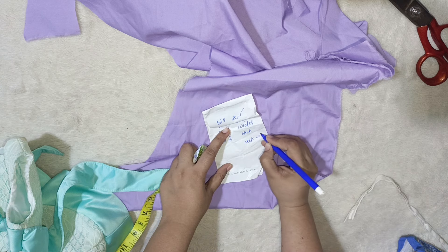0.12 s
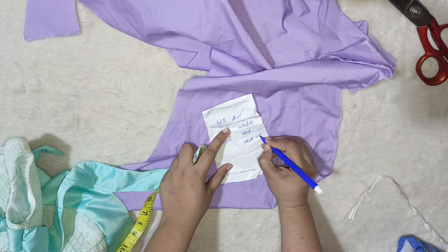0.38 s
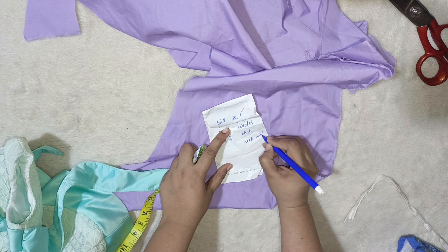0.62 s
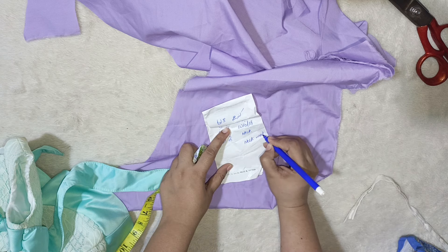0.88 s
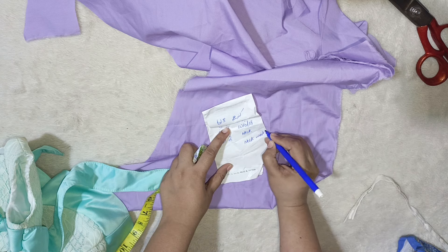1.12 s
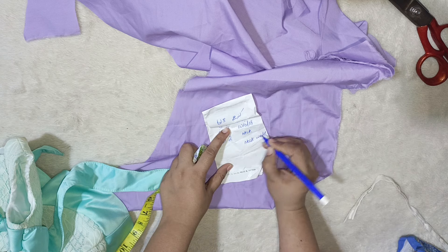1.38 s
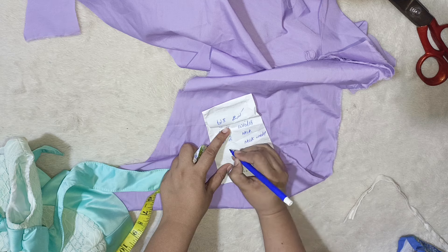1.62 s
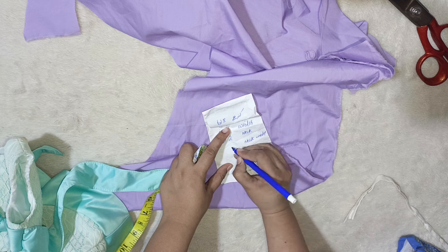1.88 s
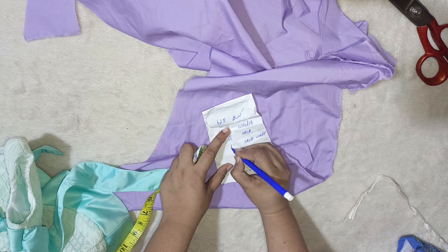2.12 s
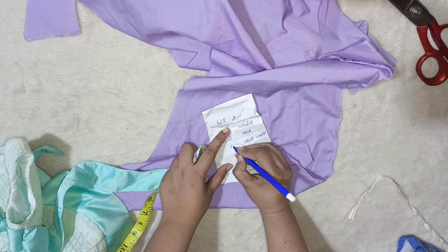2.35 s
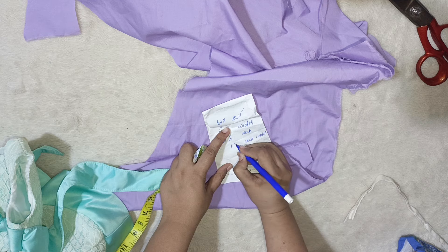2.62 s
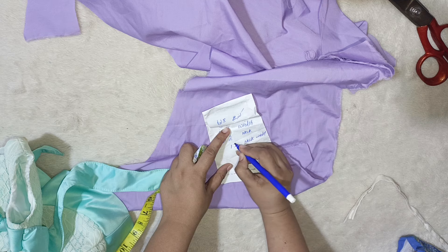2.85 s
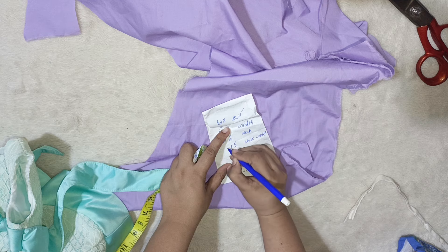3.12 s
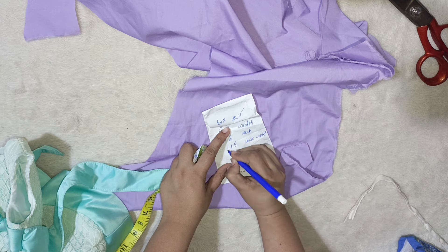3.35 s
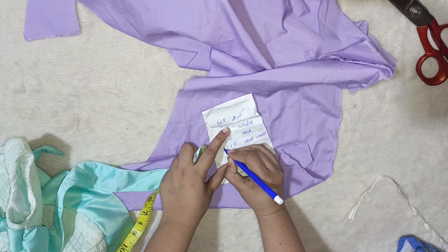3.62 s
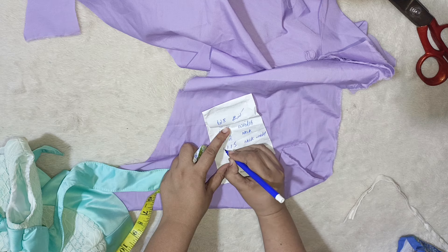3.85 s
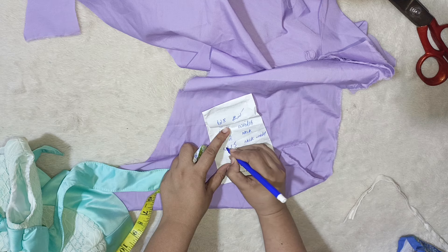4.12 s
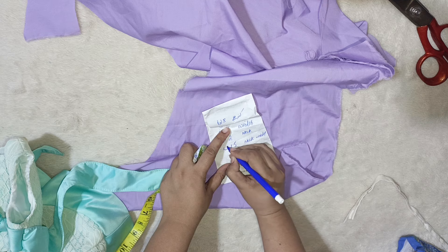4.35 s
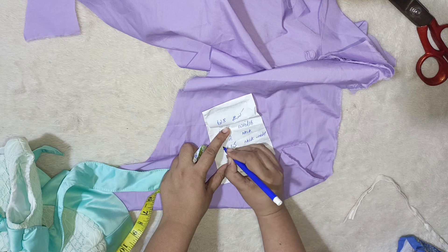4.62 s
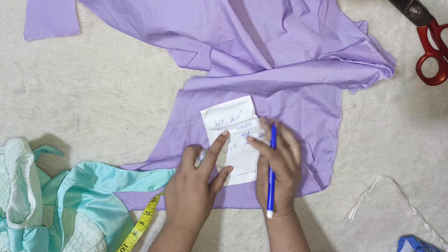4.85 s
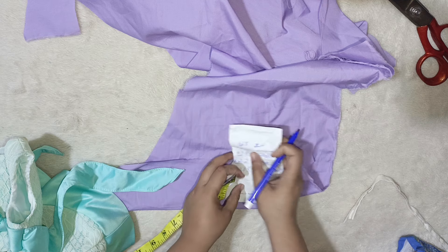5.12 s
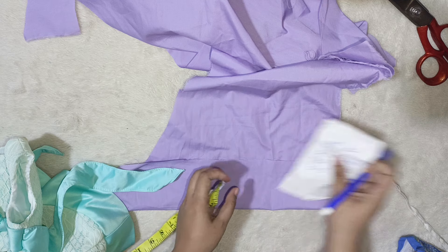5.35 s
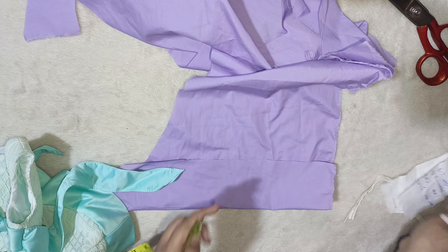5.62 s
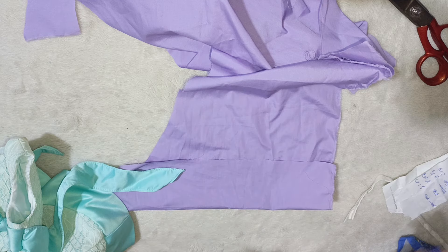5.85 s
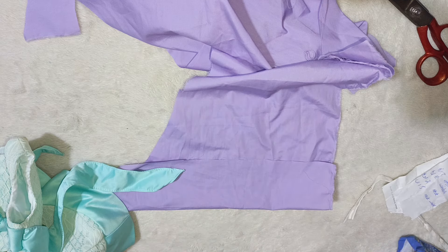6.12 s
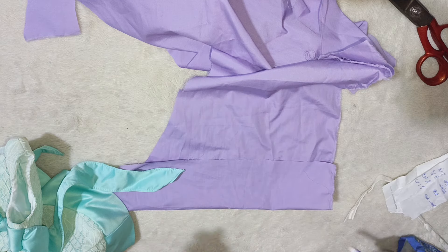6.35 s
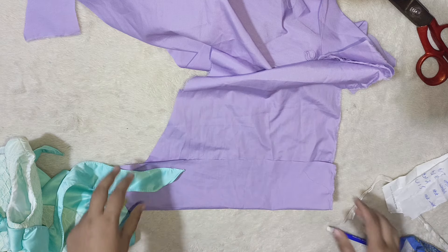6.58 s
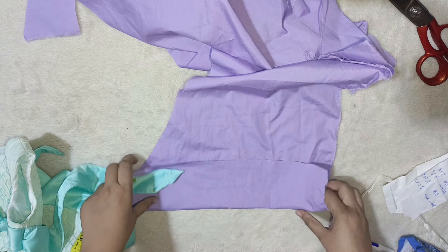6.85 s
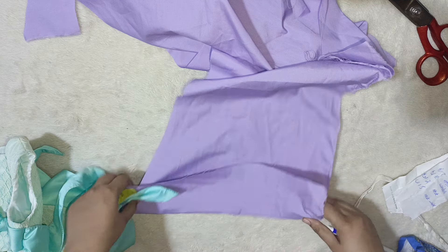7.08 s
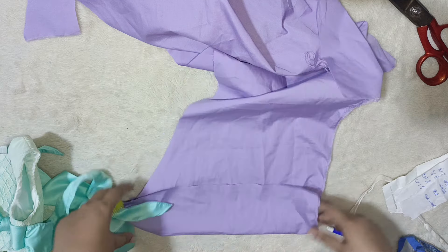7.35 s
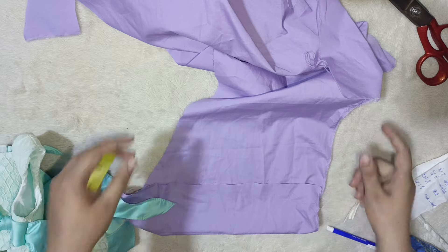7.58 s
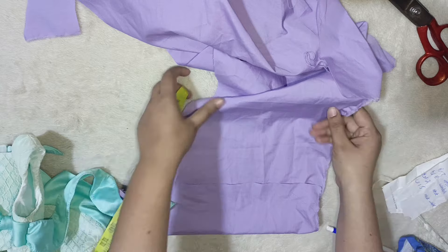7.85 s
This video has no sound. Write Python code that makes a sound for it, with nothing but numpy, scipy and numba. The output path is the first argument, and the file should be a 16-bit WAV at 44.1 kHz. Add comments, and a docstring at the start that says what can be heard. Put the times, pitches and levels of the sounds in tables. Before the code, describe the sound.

Close microphone in a quiet room with soft hiss and faint hum. Nearly silent at first, with tiny pen strokes and ticks on paper; light crackles gather around the middle. Then the slip is snatched up with a loud, bright, snapping crumple and a cupped, hollow rustle, fading as it slides away over cloth. A faint tap follows, then a pen lands with a dull double thump on a padded floor.

```python
"""Paper slip and dropped pen

A hand writes on a paper slip lying on cloth, lifts and crumples the slip, then drops a pen on a padded floor.
The sheet rustles as clicks and hiss through its resonances and snaps as ringing spikes of noise.
Hollow booms and lingering bands are resonant or narrow noise; soft thumps are short smooth swings.
Rumble in the lowest octaves, a quiet room hiss and a faint hum lie below."""
import sys
import numpy as np
from scipy import signal
from scipy.fft import rfft, irfft
from scipy.io import wavfile
from scipy.ndimage import uniform_filter1d
from numba import njit

SR = 44100
rng = np.random.default_rng(int(sys.argv[2]) if len(sys.argv) > 2 else 0)


def inscribe(sig):
    """Save sig as 16-bit PCM at rate SR to the path in sys.argv[1].

    A 1-D sig is mono; a 2-D sig holds one channel per row.
    Samples are clipped to [-1, 1] before scaling.
    """
    pcm = np.round(np.clip(np.atleast_2d(sig).T, -1, 1) * 32767)
    wavfile.write(sys.argv[1], SR, pcm.astype(np.int16))


def how_loud(loudness_db):
    """Turn decibels into a plain amplitude multiplier (0 dB gives 1, 20 dB gives 10)."""
    steps = np.asarray(loudness_db, float) / 20
    return 10 ** steps


N = 351477

# Resonances of the sheet, before rustle and snaps scale them.
# Each row: centre in hertz, width in hertz, relative level in dB.
SHEET_MODES = [(1450, 120, 1), (2070, 58, -4), (2740, 320, -3.5), (3630, 260, -4), (4500, 100, -8.5),
               (5707, 190, 1.5)]


def rms_one(x):
    """Normalisation: scale to unit rms."""
    return x / np.sqrt(np.mean(x ** 2) + 1e-20)


def even_level(x, samples):
    """Envelope division: hold the short-term rms over a sliding window near one."""
    return x / np.sqrt(uniform_filter1d(x ** 2, size=samples) + 1e-12)


def band(x, low_hz, high_hz):
    """Butterworth band-pass: flat within the band, smooth slopes outside."""
    return signal.sosfilt(signal.butter(2, [low_hz, high_hz], "band", fs=SR, output="sos"), x)


def cut(x, hz, kind):
    """Fourth-order Butterworth high- or low-pass: a steep slope beyond the corner."""
    return signal.sosfilt(signal.butter(4, hz, kind, fs=SR, output="sos"), x)


def drift(corner_hz):
    """Low-passed noise: slow random motion of unit rms, from two equal poles at corner_hz."""
    r = np.exp(-40 * np.pi * corner_hz / SR)  # computed at every 20th sample
    slow = signal.lfilter([1], [1, -2 * r, r * r], rng.standard_normal(N // 20 + 2002))[2000:]
    return np.interp(np.arange(N) / 20, np.arange(len(slow)), rms_one(slow))


def coloured(x, spectrum):
    """Spectral shaping: weight noise by a curve in dB over log frequency."""
    hz, db = np.transpose(spectrum)
    log_hz = np.log(np.maximum(np.fft.rfftfreq(N, 1 / SR), 1))
    return irfft(rfft(x) * how_loud(np.interp(log_hz, np.log(hz), db)), N)


def resonance(x, hz, width_hz):
    """Damped oscillator: a two-pole resonance with gain 1 on top."""
    r = np.exp(-np.pi * width_hz / SR)
    poles = [1, -2 * r * np.cos(2 * np.pi * hz / SR), r * r]
    return signal.lfilter(np.array([1, 0, -1]) * (1 - r * r) / 2, poles, x)


@njit
def moving_resonance(x, r, w):
    """Time-varying oscillator: centre and width move; white noise keeps its power."""
    y = np.zeros(len(x))
    for i in range(2, len(x)):
        drive = np.sqrt((1 - r[i] ** 2) / 2) * (x[i] - x[i - 2])
        y[i] = drive + 2 * r[i] * np.cos(w[i]) * y[i - 1] - r[i] ** 2 * y[i - 2]
    return y


def sliding(x, hz, width_hz):
    """Stiffness modulation: a resonance of top gain 1 whose centre slides with the bend of the sheet."""
    bend_share, bend_hz = 0.076, 1.7  # rms share of the pitch, corner of the motion
    r = np.exp(-np.pi * width_hz / SR)
    w = 2 * np.pi * hz / SR * np.exp(bend_share * drift(bend_hz))
    return np.sqrt((1 - r * r) / 2) * moving_resonance(x, np.full(N, r), w)


def place(out, s, sound):
    """Superposition: add a sound at time s in seconds."""
    i = round(s * SR)
    return out + np.pad(sound, (i, N))[:N]


def swells(rows):
    """Exponential growth and decay: straight lines in dB, 20 dB down at the end of the rise and fall times."""
    out = np.zeros(N)
    for peak, rise_ms, fall_ms, db in rows:
        rise, fall = rise_ms / 1000, fall_ms / 1000
        # each side runs on for twice its time
        i = np.arange(max(round((peak - 2 * rise) * SR), 0), min(round((peak + 2 * fall) * SR), N))
        t = i / SR - peak
        out[i] += how_loud(db - 20 * np.maximum(-t / rise, t / fall))
    return out


def curve_gain(s, db):
    """Logarithmic interpolation: gain along a curve in dB, silent outside it."""
    return how_loud(np.interp(np.arange(N) / SR, s, db, left=-200, right=-200))


def strokes():
    """Friction envelopes: levels of the rustle, its upper part and its top end, strokes over a steady slide."""
    # Separate strokes of pen, hand and fingers on sheet and cloth. Each row: peak time in seconds,
    # rise in ms, fall in ms, rustle level in dB, top end in dB over the rustle.
    stroke_rows = [(.178, 24, 31, -80.5, 9.5), (0.345, 16, 17, -73.5, 9), (0.434, 68, 45, -74, -1),
                   (.5, 16, 51, -71.5, -4), (.687, 44, 44, -73, 5), (0.816, 43, 48, -72.5, 2),
                   (0.913, 27, 31, -69.5, -12), (1.136, 27, 44, -70.5, -30), (1.195, 45, 38, -68.5, -4),
                   (1.329, 58, 54, -72, 4), (1.691, 32, 33, -61, -7), (2.205, 23, 53, -42, -15),
                   (2.429, 500, 330, -73.5, -44), (2.604, 6.5, 20, -63, -7), (2.698, 67, 65, -60, -56),
                   (2.824, 55, 50, -69, -29), (3.007, 47, 50, -60, -49), (3.056, 2.9, 290, -51.5, -2.5),
                   (3.087, 20, 33, -45, -4), (3.137, 170, 85, -67, -6), (3.186, 44, 62, -50, -16),
                   (3.303, 11.5, 9.6, -47, -12), (3.321, 1.86, 20, -56, -22), (3.388, 38, 79, -56, -28),
                   (3.421, 29, 13, -49, -22), (3.622, 52, 46, -67, -19), (3.699, 37, 44, -62, -43),
                   (4.003, 40, 39, -50, -51), (4.425, 25, 28, -67, -34), (4.712, 30, 35, -66, -29),
                   (4.779, 3.5, 11.6, -53.5, -4.5), (4.994, 39, 110, -46.5, 3), (5.06, 31, 23, -35, -4),
                   (5.096, 15, 35, -39.5, -16), (5.168, 78, 42, -31.5, -3), (5.194, 110, 25, -27.5, -9),
                   (5.266, 7, 68, -38, -20), (5.291, 32, 27, -32.5, -9), (5.413, 57, 20, -47, -9.5),
                   (5.451, 16, 53.6, -37, -8), (5.482, 32, 19, -43.5, -12), (5.611, 19, 47, -45.5, -13),
                   (5.652, 21, 41, -59.5, -10), (6.131, 11, 157, -62, -6), (6.511, 7.2, 200, -61.5, -9),
                   (6.668, 230, 35, -69.5, -8), (6.56, 90, 83, -53.5, -14.5), (6.968, 59, 74, -69.5, -1),
                   (7.58, 55, 55, -70.5, -3.5)]
    # The slip is gathered up and drawn away over the cloth. Each row: time in seconds, rustle level in dB.
    slide_rows = [(4.79, -73.5), (4.93, -62), (5.24, -45), (5.36, -51), (5.53, -63.5), (5.691, -55),
                  (5.84, -65), (5.99, -58), (6.109, -63), (6.19, -65), (6.219, -76.5)]
    slide_top_db = -13.5  # over the rustle of the slide
    slide = curve_gain(*np.transpose(slide_rows))
    levels = []
    # the part above 3.3 kHz takes a quarter of the top end's offset, the top end all of it
    for share in (0, 0.25, 1):
        rows = [(s, rise, fall, db + share * top_db) for s, rise, fall, db, top_db in stroke_rows]
        levels.append(how_loud(share * slide_top_db) * slide + swells(rows))
    return levels


def rustle():
    """Stick-slip friction: fibres slip as clumped clicks over a hiss, grainier when loud, and excite the sheet."""
    # Colour of the sheet at the microphone. Each row: frequency in hertz, density in dB per hertz.
    sheet_colour = [(600, -24), (850, -4), (1300, -1), (2100, 0), (3100, -6), (4800, -3.5), (6600, -7),
                    (8300, -20), (11500, -17), (13500, -19), (14700, -11), (16300, -13), (17000, -45)]
    # Span in which the sheet, pressed flat, lacks its part below 1.6 kHz: start and end in seconds.
    taut_span = (3.145, 3.285)
    held_until_s, flat_song_share = 5.53, .3  # once let go and dragged flat, the sheet hardly sings
    clicks_per_s, clump_db, spread_db = 1300, 5.5, 5  # rate before clumping
    modes_db, sing_db, flutter_db = 1.5, 6, 3
    low_level, upper_level, top_level = strokes()
    t = np.arange(N) / SR

    force = np.clip((20 * np.log10(low_level + 1e-9) + 66) / 20, .25, 1)
    born = rng.random(N) < clicks_per_s * how_loud(clump_db * drift(80)) / SR
    size = how_loud(spread_db * np.minimum(rng.exponential(1, N), 4))
    grains = born * size * rng.choice([-1, 1], N)
    slips = force * rms_one(grains) + np.sqrt(1.6 - force ** 2) * rng.standard_normal(N)

    # every resonance sings up and down in level while its centre slides
    song = sum(how_loud(db + sing_db * drift(14)) * sliding(slips, hz, w) for hz, w, db in SHEET_MODES)
    song_share = np.where(t < held_until_s, 1, flat_song_share)
    sheet = coloured(slips + how_loud(modes_db) * song_share * song, sheet_colour)

    low = rms_one(cut(sheet, 7800, "low"))
    top = rms_one(cut(sheet, 7800, "high"))
    is_taut = (t > taut_span[0]) & (t < taut_span[1])
    low = np.where(is_taut, cut(low, 1600, "high"), low)
    lower = low_level * cut(low, 3300, "low")
    upper = how_loud(1.5) * upper_level * cut(low, 3700, "high")
    return how_loud(flutter_db * force * drift(94)) * (lower + upper + top_level * top)


def snaps():
    """Impulse response: a crease pops as a spike with brief crackle, ringing its patch and higher sheet modes."""
    # Creases that pop. Each row: time in seconds, peak below 7.8 kHz in dB, ring in hertz,
    # top-end peak in dB over that peak.
    crease_rows = [(0.335, -68.5, 2020, 25), (0.629, -51.5, 1740, -21), (0.896, -50.5, 1690, -16),
                   (1.677, -46, 1450, -1), (1.694, -40.5, 1225, -27), (2.0725, -53, 1400, -20),
                   (2.133, -49, 1490, -7), (2.138, -47.5, 1310, -22), (2.155, -54, 1850, -20),
                   (2.1767, -45, 2070, -23), (2.197, -24, 1820, -8.5), (2.246, -41, 1920, -27),
                   (2.381, -37.5, 5650, -10), (2.396, -50.5, 990, -25), (2.4377, -46, 1350, -28),
                   (2.601, -42, 2030, -19), (2.823, -47, 2980, -25), (2.842, -43.5, 1710, -20),
                   (2.9739, -38.5, 2040, -18), (3.0534, -35.5, 2200, 0), (3.069, -45, 1390, -7),
                   (3.092, -24, 2560, -8), (3.155, -27.5, 2700, -7), (3.183, -21.5, 3250, -30),
                   (3.22, -34, 2300, -23), (3.2988, -26, 3420, -54), (3.307, -26.5, 2070, -14),
                   (3.319, -53, 1530, -16), (3.366, -45, 2100, -15), (3.4043, -20.5, 2250, -13),
                   (3.4197, -39, 1570, -11), (3.6372, -46.5, 990, -8), (3.9582, -40, 2490, -38),
                   (4.415, -45, 1590, -28), (4.707, -51.5, 2210, -23), (4.7785, -35.5, 2370, -13),
                   (4.8378, -45.5, 3570, 1), (4.8682, -46, 6400, -5), (4.986, -28, 3900, -8.5),
                   (5.0474, -15, 3900, -8), (5.091, -25, 2060, -12.5), (5.1298, 3, 4116, -4.5),
                   (5.158, -19.5, 1480, -3.5), (5.171, -7.5, 6287, -18.5), (5.175, -16, 3570, -9.5),
                   (5.1868, -14, 2030, -15.5), (5.2625, -17, 4770, -11.5), (5.2892, -2, 2766, -7),
                   (5.465, -22.5, 1660, -20.5), (5.4831, -26, 1380, -8.5), (5.5564, -51, 2160, 3),
                   (5.578, -37, 4050, -5), (5.6022, -31, 2420, -19.5), (5.611, -39.5, 1500, -14),
                   (5.649, -38, 1490, -4), (5.696, -53, 3060, 11), (5.736, -30.5, 4200, -13),
                   (6.1251, -40, 1600, -4), (6.506, -38.5, 1830, -17.5), (6.538, -40, 3900, -12.5),
                   (7.74, -55.5, 2305, -24)]
    ring_db, ring_width = 15, 0.055  # ring gain for a -40 dB pop, width as a share of its pitch
    modes_db, mode_width = 3, 2.5  # mode gain, widening of the sheet's resonances
    out, t = np.zeros(N), np.arange(2000) / SR
    noise = rng.standard_normal((len(crease_rows), len(t) + len(SHEET_MODES)))
    for (s, db, hz, top_db), draw in zip(crease_rows, noise):
        crackle_s = .008 + .00012 * (db + 60)  # time to fall 60 dB: big folds crackle longer
        pop = draw[:len(t)] * how_loud(-60 * t / crackle_s) * .3
        pop[0] -= 3
        spread = 2.16 + 0.02 * (db + 47)  # big folds sound broad, small ticks keep one colour
        edges = max(hz / spread, 800), min(spread * hz, 7200)
        body = band(band(pop, *edges), *edges)
        body = body + how_loud(ring_db - .2 * (db + 40)) * resonance(pop, hz, ring_width * hz)
        for (mode_hz, width_hz, mode_db), luck in zip(SHEET_MODES, draw[len(t):]):
            if mode_hz <= hz:
                continue
            # 7.2 dB weaker per octave above the ring, with random strength
            gain = how_loud(modes_db + mode_db + 2.3 * luck - 7.2 * np.log2(mode_hz / hz))
            width = mode_width * width_hz
            body = body + gain * resonance(resonance(pop, mode_hz, width), mode_hz, 2 * width)
        body = cut(body, 7800, "low")
        top = band(pop, 8500, 16000) + 2.5 * resonance(pop, 14800, 900)
        sound = body / np.abs(body).max() + how_loud(top_db) * top / np.abs(top).max()
        out = place(out, s, how_loud(db) * sound)
    return out


def hollow():
    """Cavity resonance: noise passes three times through one moving resonance, for cupped sheet and floor."""
    # The sheet cupped in the hand booms along with its rustle. Each row: time in seconds,
    # centre in hertz, boom in dB over the rustle before the common gain below.
    cup_rows = [(4.94, 563, -6), (4.99, 709, -2.5), (5.1, 460, -5), (5.19, 540, -0.7), (5.25, 512, 1.5),
                (5.289, 615, -3), (5.36, 527, 0.5), (5.41, 724, 6), (5.46, 650, -2), (5.52, 610, 9),
                (5.581, 625, -3)]
    # Booms of the padded floor. Each row: peak time in seconds, rise in ms, fall in ms,
    # level in dB before the common gain and the padding's low-pass, centre in hertz.
    boom_rows = [(3.099, 45, 29, -54.5, 214), (6.133, 7.6, 70, -40.5, 235.5), (6.19, 45, 54, -59.5, 169.9),
                 (6.532, 19, 58, -25, 324), (6.576, 52, 48, -32, 289)]
    stage_width, padding_cut_hz = 0.936, 396  # width of one pass as a share of its centre
    gain_db, flutter_db = 2, 1
    s, _, over_db = np.transpose(cup_rows)
    cupped = curve_gain(s, over_db) * strokes()[0]
    floor = swells([row[:-1] for row in boom_rows])

    centres = sorted([row[:2] for row in cup_rows] + [(row[0], row[-1]) for row in boom_rows])
    hz = np.interp(np.arange(N) / SR, *np.transpose(centres))
    r, w = np.exp(-np.pi * stage_width * hz / SR), 2 * np.pi * hz / SR
    tone = rng.standard_normal(N)
    for _ in range(3):
        tone = moving_resonance(tone, r, w)
    tone = even_level(cut(tone, 1100, "low"), 2000)
    # the padding swallows the upper part of the floor's boom
    padded = cut(tone, padding_cut_hz, "low")
    return how_loud(flutter_db * drift(40) + gain_db) * (cupped * tone + floor * padded)


def lingering(rows, width_hz, flutter_db, edge_s):
    """Heterodyning: slow complex noise shifted up to a wandering pitch makes steep bands, gated on and off."""
    wander_share = 0.012  # rms share of the pitch
    out, wander, flutter = np.zeros(N), drift(9.8), drift(78)
    edge = signal.butter(4, width_hz / 2, fs=SR, output="sos")
    for start, end, hz, first_db, last_db in rows:
        t = np.arange(round((end - start) * SR)) / SR
        real, imag = signal.sosfilt(edge, rng.standard_normal((2, 14000)))
        slow = (real + 1j * imag) / np.sqrt(uniform_filter1d(real ** 2 + imag ** 2, size=500) / 2)
        pitch = hz * np.exp(wander_share * wander[round(start * SR):][:len(t)])
        carrier = np.exp(2j * np.pi * np.cumsum(pitch) / SR)
        narrow = np.real(slow[3000:][:len(t)] * carrier)  # past the filter's onset
        gate = np.clip(np.minimum(t, t[-1] - t) / edge_s, 0, 1)
        out = place(out, start, gate * how_loud(np.linspace(first_db, last_db, len(t))) * narrow)
    return out * how_loud(flutter_db * flutter)


def tones():
    """Bandwidth sets roughness: narrow noise lingers as tones, broader noise murmurs more roughly."""
    # Narrow tones that linger. Each row: start and end in seconds, centre in hertz, first and last level in dB.
    tone_rows = [(0.424, 0.465, 1950, -70, -76), (0.491, 0.525, 2770, -73, -79),
                 (0.778, 0.88, 409, -91, -62.5), (1.115, 1.142, 2940, -68, -71),
                 (1.194, 1.242, 1964, -62, -77), (2.035, 2.162, 1585, -81, -67),
                 (3.056, 3.15, 772, -66, -63), (3.072, 3.094, 1450, -39, -45),
                 (3.088, 3.135, 1450, -53, -67), (3.15, 3.277, 2006, -55.5, -65),
                 (3.165, 3.215, 1743, -56, -63), (3.235, 3.279, 2790, -57, -74),
                 (3.308, 3.358, 778, -52.5, -69), (3.404, 3.435, 773, -54, -56),
                 (4.018, 4.155, 800, -64, -70), (4.147, 4.29, 796, -56, -69),
                 (5.102, 5.132, 1837, -30, -32), (5.128, 5.158, 2070, -37, -32),
                 (5.118, 5.21, 253, -40.5, -42), (5.493, 5.61, 622, -59, -55),
                 (5.604, 5.765, 610, -39.5, -60.5), (5.758, 5.883, 617, -47, -70.5),
                 (5.854, 5.98, 622, -48, -61), (5.935, 6.035, 408, -58, -62),
                 (5.972, 6.134, 603, -46, -58.5), (6.136, 6.219, 459, -36, -64),
                 (6.562, 6.65, 928, -55.5, -69), (6.616, 6.689, 341, -36, -57)]
    # Broader, rougher bands of murmuring noise. Each row: start and end in seconds,
    # centre in hertz, first and last level in dB.
    broad_rows = [(0.425, 0.46, 1450, -75, -73), (0.892, 0.926, 798, -56.5, -75),
                  (1.272, 1.312, 707, -68, -73), (2.18, 2.285, 721, -49, -55), (2.395, 2.45, 780, -65, -81),
                  (2.448, 2.506, 786, -63, -63), (2.665, 2.72, 1900, -66, -76),
                  (3.646, 3.72, 705, -61, -63.5), (5.355, 5.44, 2700, -49, -63),
                  (5.435, 5.5, 2610, -37, -64), (6.965, 7.0, 4500, -72, -76)]
    narrow = lingering(tone_rows, width_hz=72, flutter_db=1.8, edge_s=.008)
    broad = lingering(broad_rows, width_hz=175, flutter_db=3.5, edge_s=.015)
    return narrow + broad


def thuds():
    """Gaussian pulse: a soft thump swells and fades evenly over a few smooth swings."""
    # Soft low thumps in the crumpling sheet and, later, on the padded floor. Each row: time in seconds,
    # peak level in dB, swing in hertz, half length (fall to 1/e) in seconds.
    thump_rows = [(3.404, -30.5, 823, 0.003), (4.988, -34.5, 727, 0.0044), (5.094, -18, 386, 0.003),
                  (5.161, -19, 328, 0.0032), (5.168, -19.5, 630, 0.0014), (5.189, -18.5, 470, 0.0018),
                  (6.131, -27.5, 246, 0.0043), (6.508, -11.5, 283, 0.0021), (6.54, -5, 315, 0.0019),
                  (6.562, -15.5, 302, 0.0016)]
    out, t = np.zeros(N), np.arange(-1500, 1500) / SR
    for s, db, hz, half_s in thump_rows:
        swing = np.exp(-(t / half_s) ** 2) * np.cos(2 * np.pi * hz * t)
        out = place(out, s + t[0], -how_loud(db) * swing)
    return out


def rumble():
    """Low-frequency band noise: hand weight shifting on the floor makes lumps in the lowest octaves."""
    # Each row: peak time in seconds, rise in ms, fall in ms, level in dB.
    weight_rows = [(.085, 260, 130, -59.5), (2.214, 27, 180, -58.5), (3.125, 170, 250, -63.5),
                   (3.486, 380, 330, -62.5), (4.104, 230, 125, -53), (5.158, 300, 1650, -64),
                   (6.141, 12, 118, -48.5), (6.227, 77, 24, -45), (6.452, 82, 53, -49),
                   (6.525, 23, 60, -48)]
    lump = band(band(rng.standard_normal(N), 50, 140), 25, 130)
    return swells(weight_rows) * even_level(lump, 3000)


def room():
    """Stationary noise floor: smooth hiss that barely swells, and hum as noise through narrow resonances."""
    # Colour of the hiss. Each row: frequency in hertz, relative density in dB per hertz.
    hiss_colour = [(30, -12.5), (60, -5), (85, 2), (166, -0.5), (274, -7), (313, -6), (465, -6.5),
                   (559, -9), (1410, -13.5), (3730, -20), (11000, -26), (15100, -20), (16300, -23)]
    # Wavering hum. Each row: frequency in hertz, rms level in dB.
    hum_rows = [(49, -84.5), (95, -82.5), (190, -79.5), (279, -82)]
    hiss_db, hum_width_hz = -69.5, 3.8
    hiss = coloured(rng.standard_normal(N), hiss_colour) * how_loud(.7 * drift(6))
    hum = sum(how_loud(db) * rms_one(resonance(rng.standard_normal(N), hz, hum_width_hz)) for hz, db in hum_rows)
    return how_loud(hiss_db) * rms_one(hiss) + hum


def scene():
    """Linear superposition: all sources add at one close microphone."""
    return (rustle() + snaps() + hollow() + tones() + thuds() + rumble() + room())[None]


def band_limit(x):
    """A steep low-pass at the top of the band."""
    return signal.sosfilt(signal.butter(12, 17150, fs=SR, output="sos"), x)


def record(dry):
    """Band limits and saturation: deepest bass and extreme top are filtered away and loud peaks softly limited."""
    limited = .92 * np.tanh(cut(dry, 42, "high") / .92)
    top_edge = signal.ellip(6, .5, 26, 15900, fs=SR, output="sos")
    mix = signal.sosfilt(top_edge, limited)
    return band_limit(mix)


dry = scene()
out = record(dry)
inscribe(out)
```